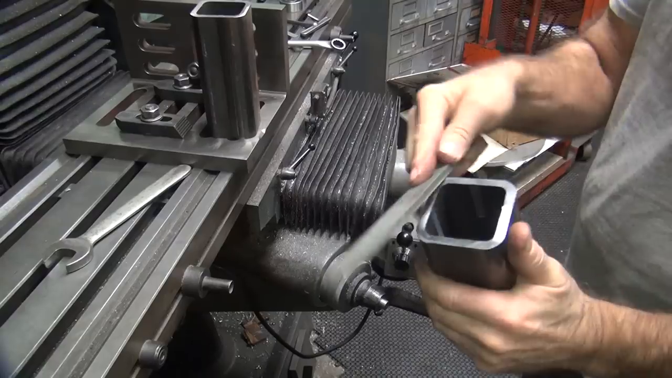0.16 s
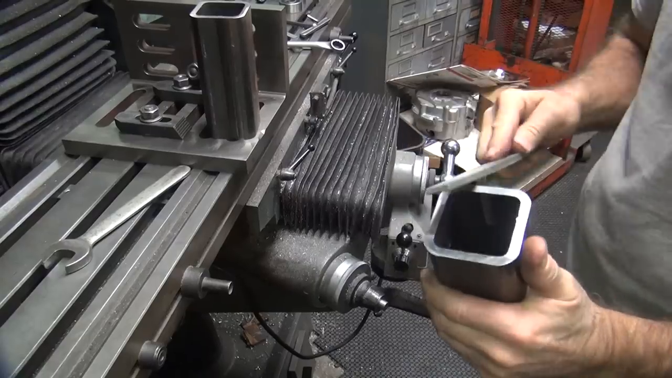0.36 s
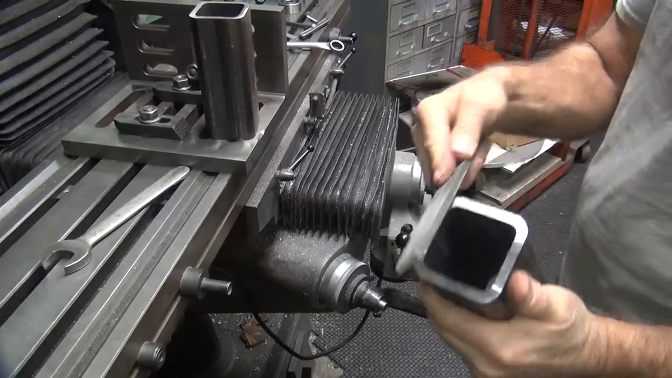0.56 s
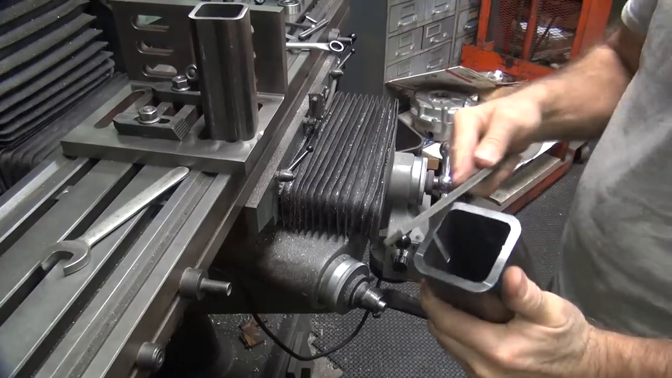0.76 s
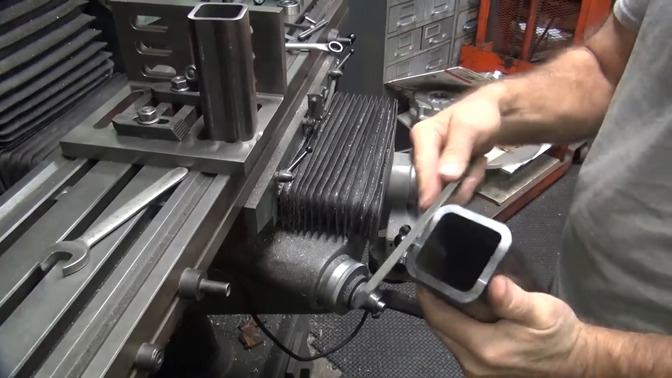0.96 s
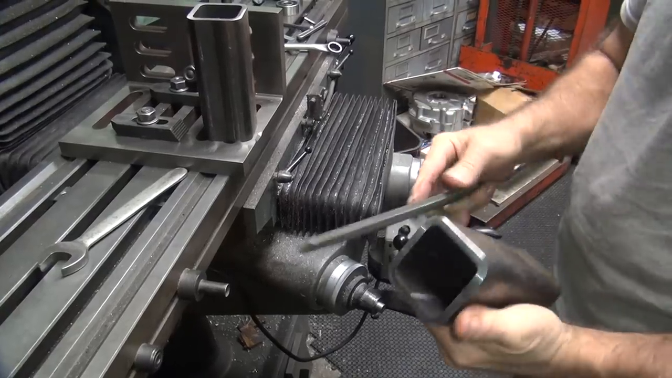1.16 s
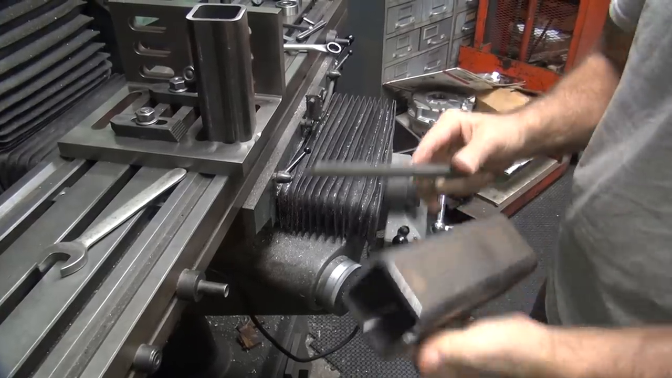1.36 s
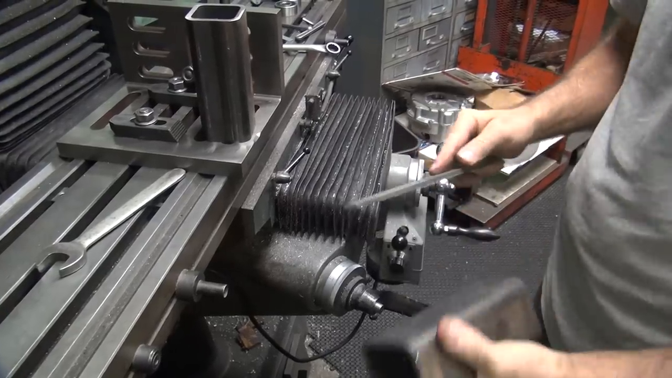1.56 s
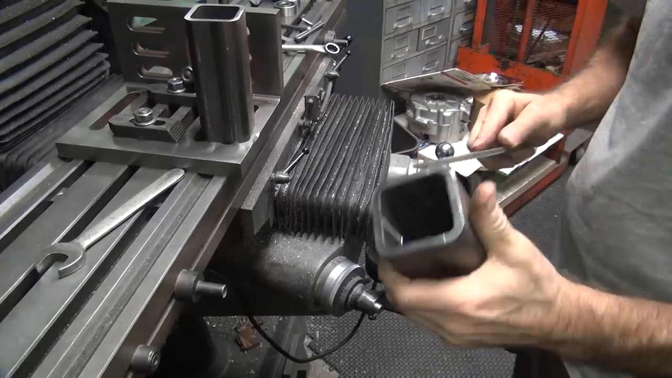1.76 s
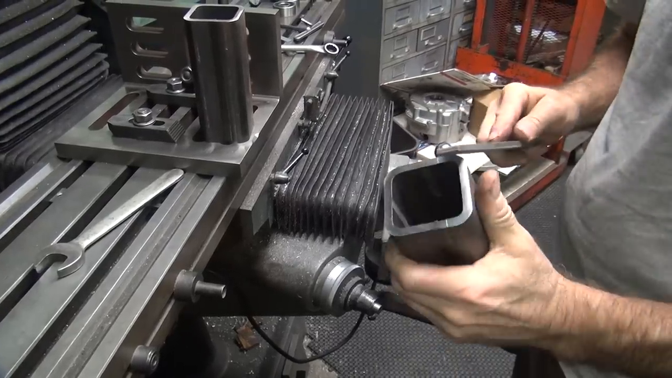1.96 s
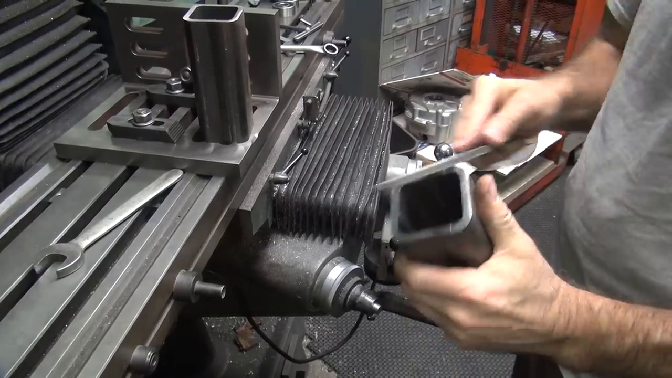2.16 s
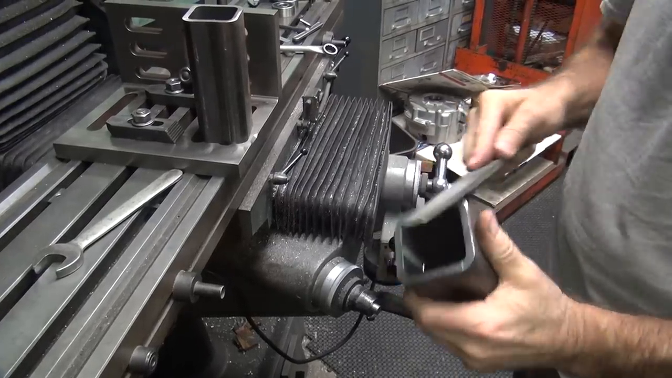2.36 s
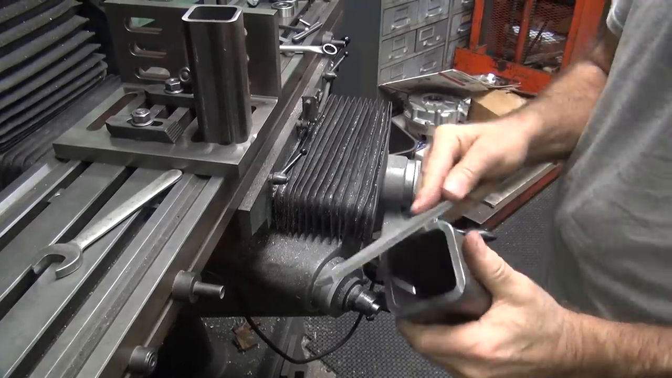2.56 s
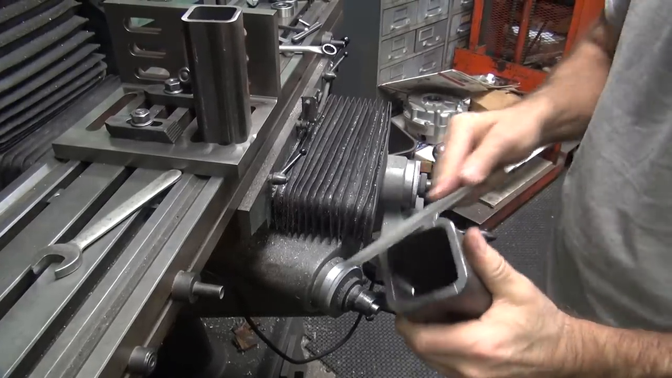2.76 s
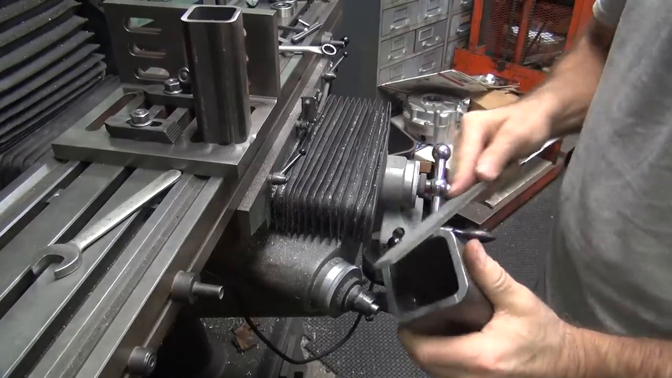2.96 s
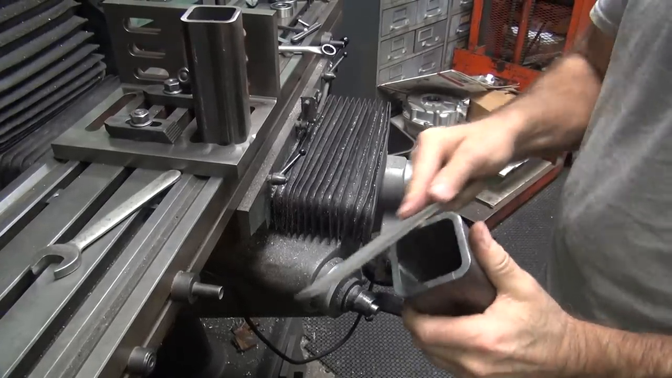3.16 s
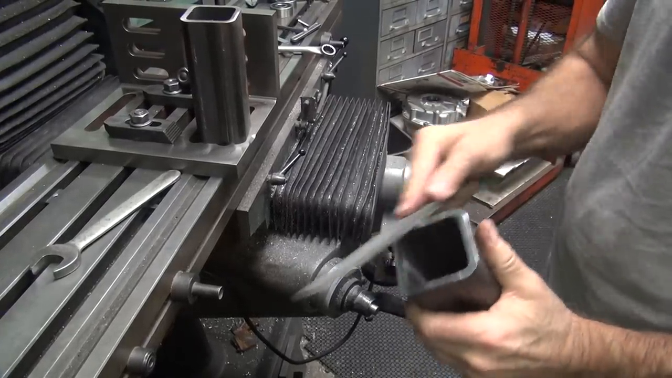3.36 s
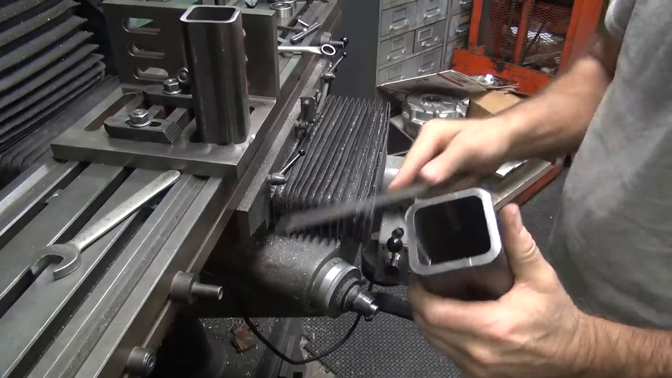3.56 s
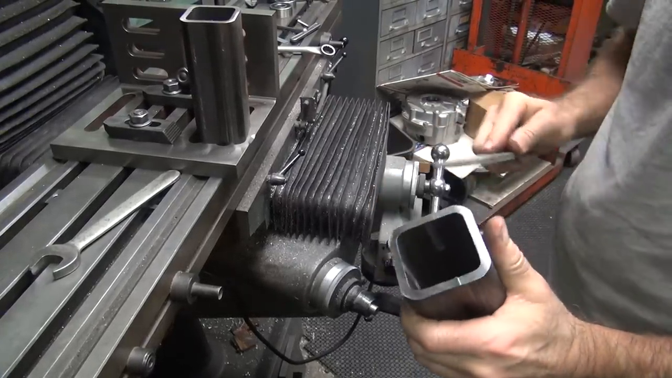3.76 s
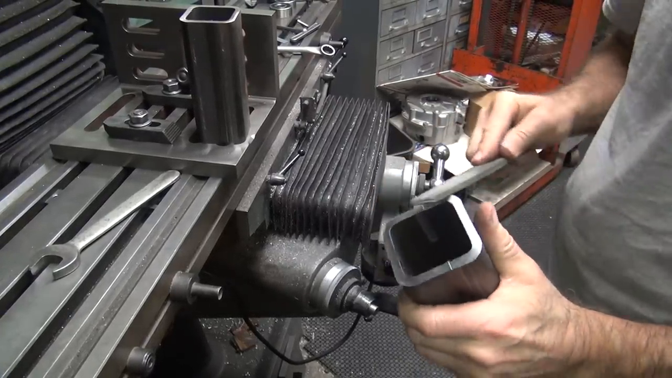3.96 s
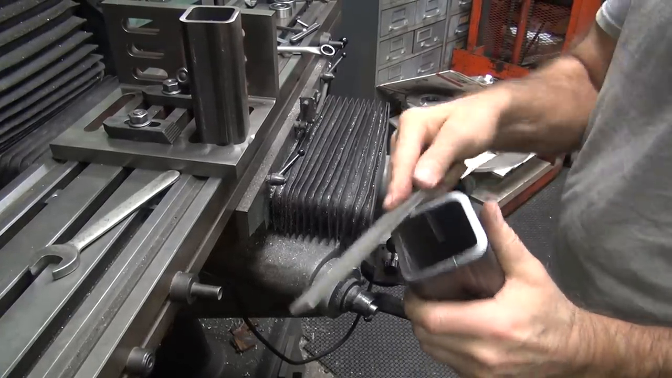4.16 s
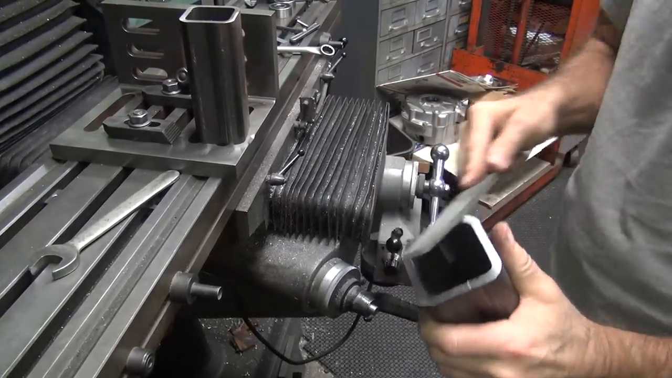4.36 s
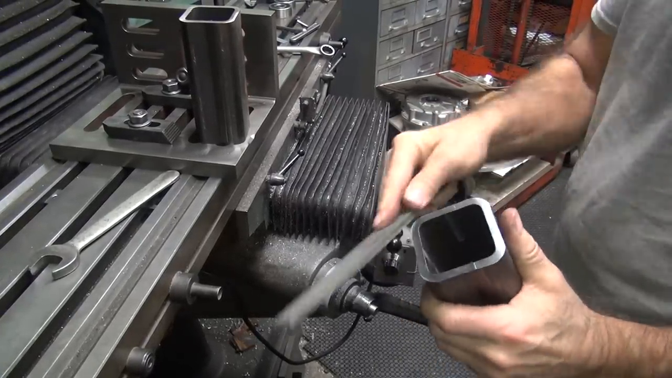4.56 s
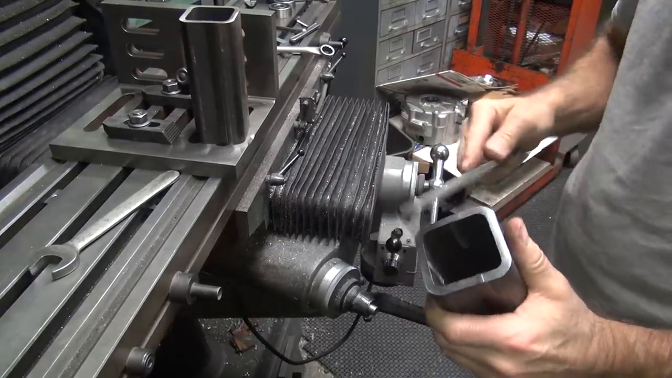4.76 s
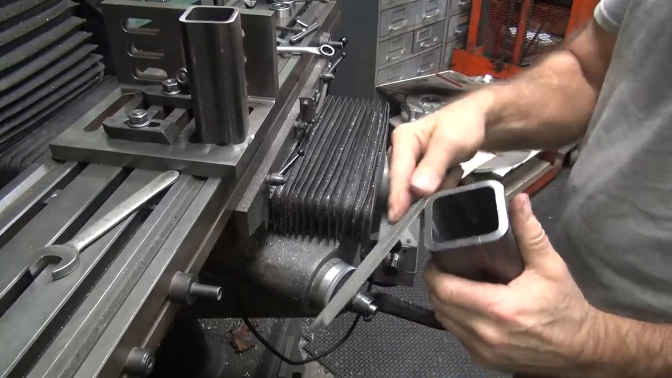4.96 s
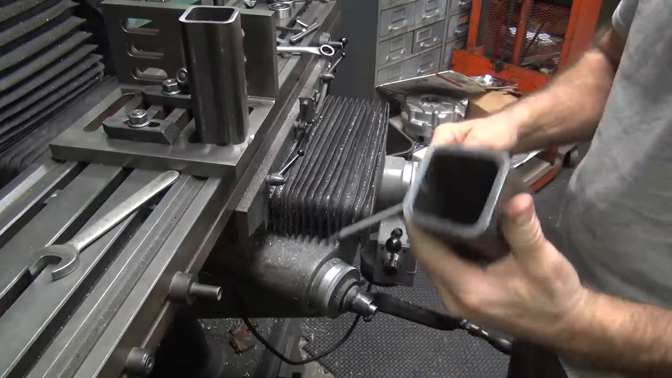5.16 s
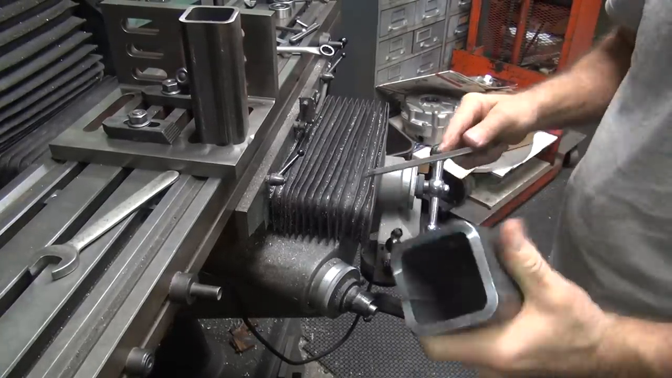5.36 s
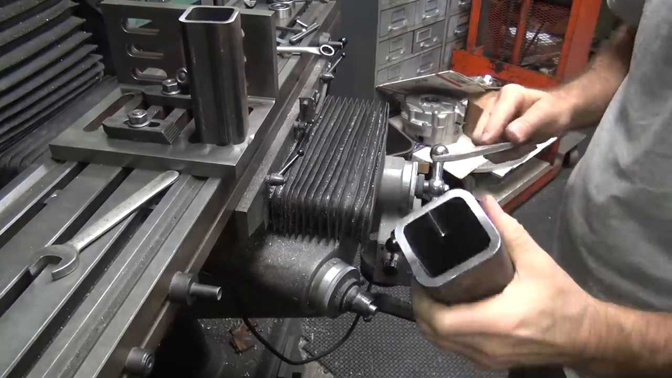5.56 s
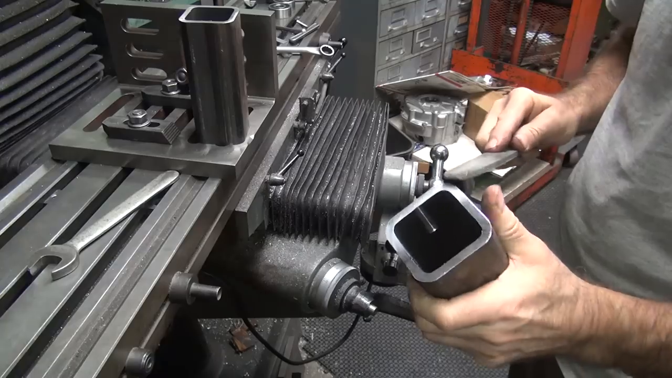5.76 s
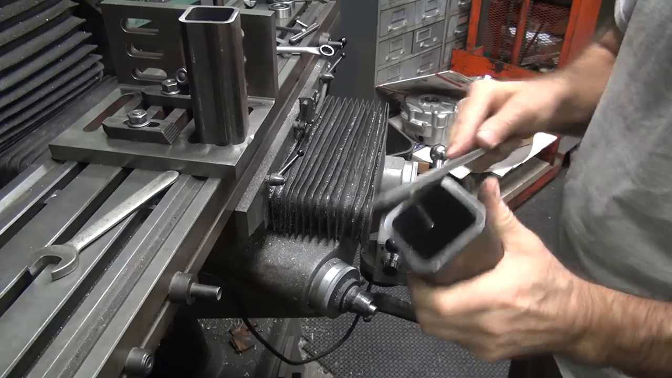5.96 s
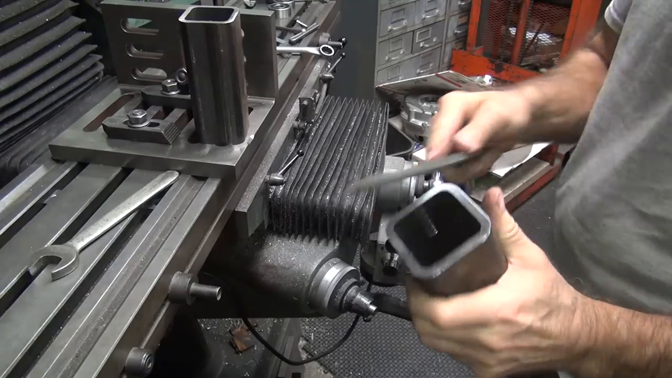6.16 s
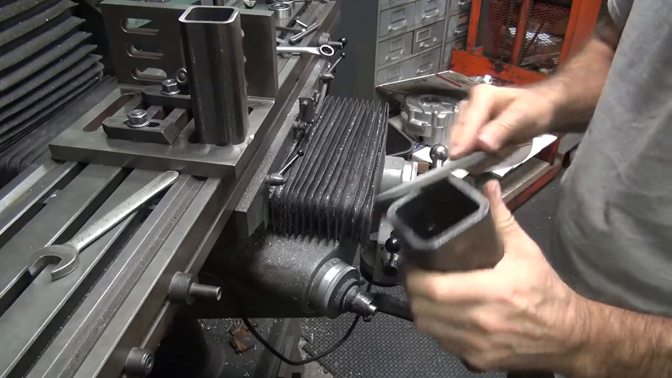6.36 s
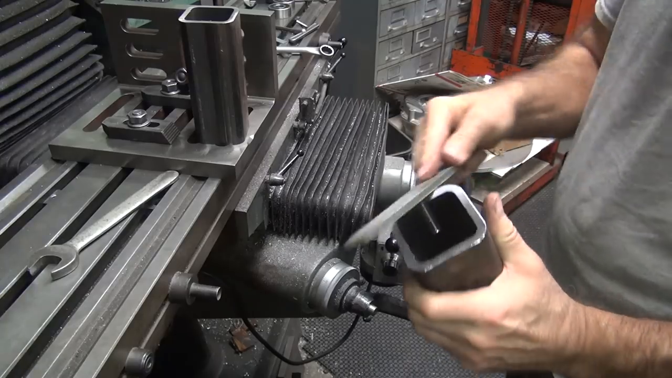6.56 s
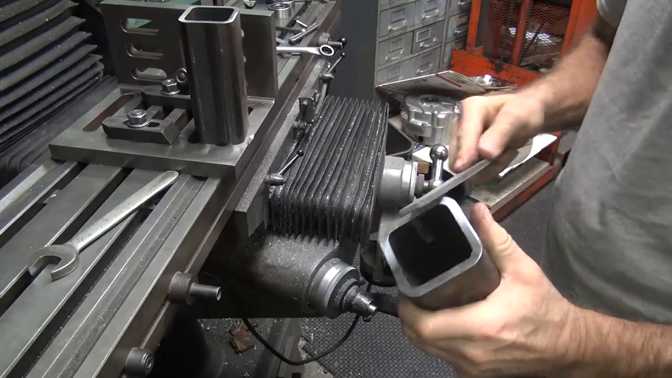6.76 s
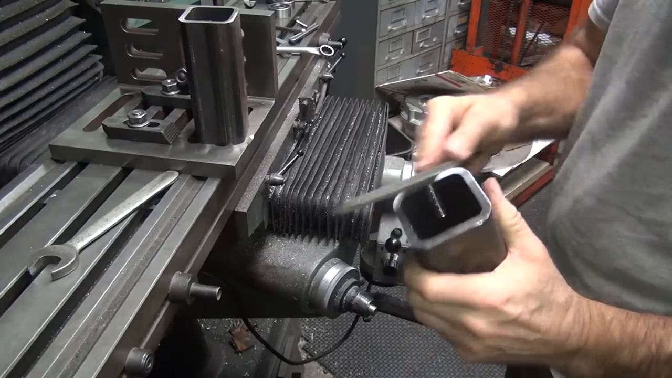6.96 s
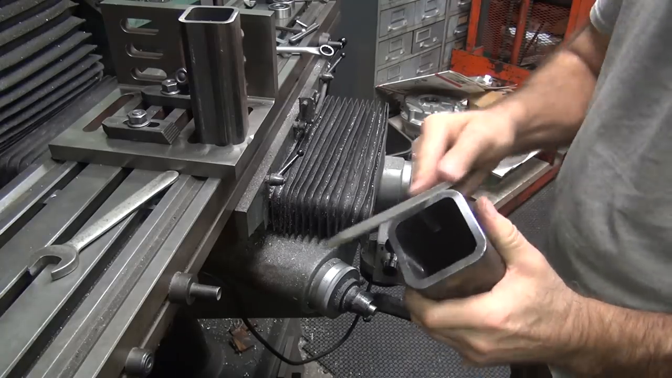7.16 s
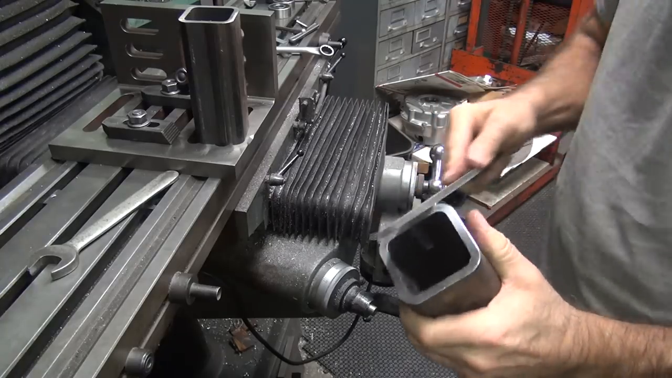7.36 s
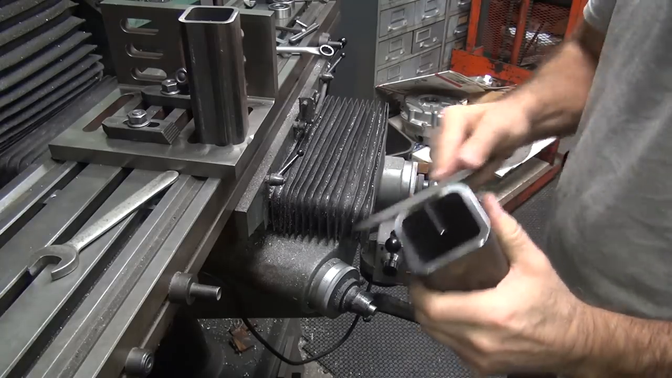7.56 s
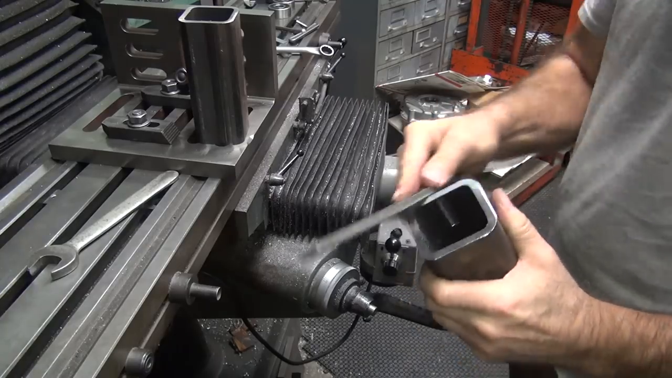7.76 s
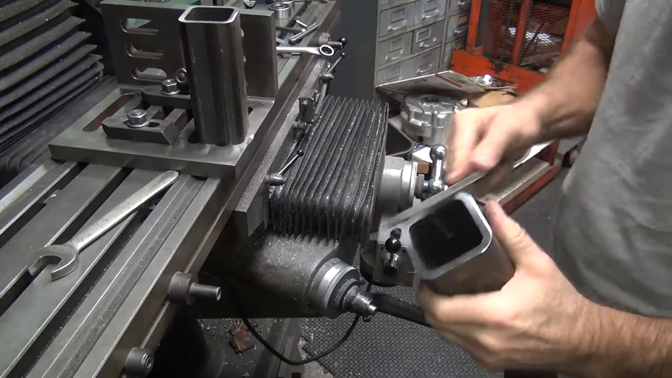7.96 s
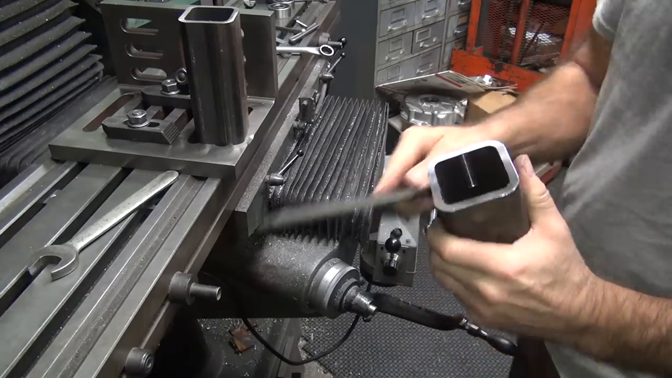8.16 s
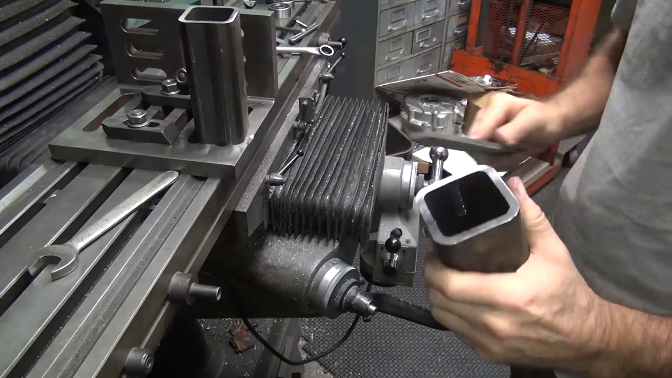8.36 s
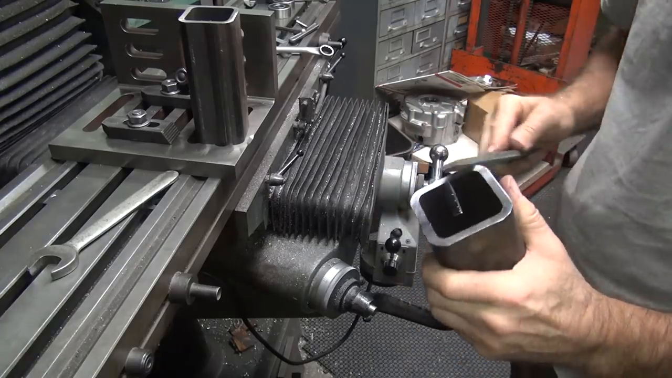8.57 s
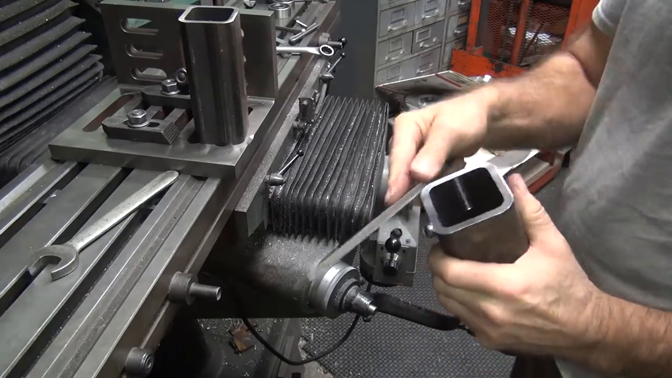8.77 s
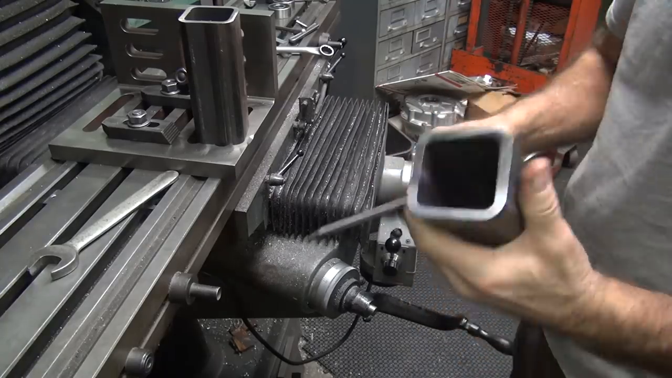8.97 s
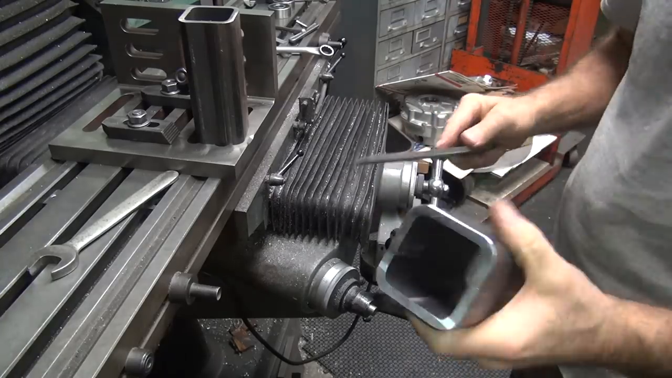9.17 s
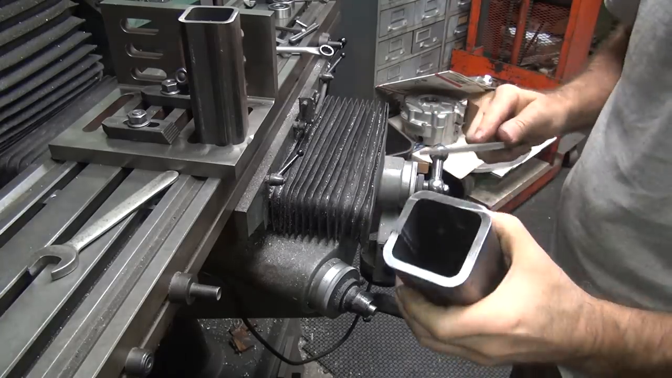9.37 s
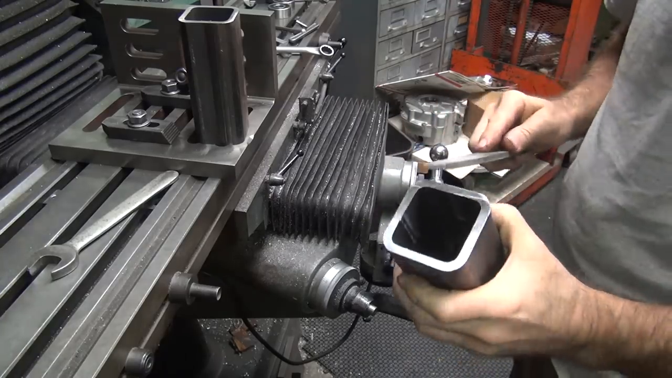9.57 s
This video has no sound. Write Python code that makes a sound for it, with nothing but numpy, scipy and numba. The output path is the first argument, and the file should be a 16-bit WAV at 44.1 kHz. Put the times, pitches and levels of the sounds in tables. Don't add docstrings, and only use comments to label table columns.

```python
import sys
import numpy as np
from scipy import signal
from scipy.fft import rfft, irfft, next_fast_len
from scipy.io import wavfile
from scipy.ndimage import uniform_filter1d
from numba import njit

SR = 44100
rng = np.random.default_rng(int(sys.argv[2]) if len(sys.argv) > 2 else 0)


def invert_db(level):
    return 10 ** (np.asarray(level, dtype=float) / 20)


def master(y):
    cut = np.clip(np.atleast_2d(y).T, -1, 1)
    pcm = np.round(cut * 32767)
    wavfile.write(sys.argv[1], SR, pcm.astype(np.int16))


N = 424241
TIME = np.arange(N) / SR

# start_s, rise_s, hold_s, rasp_db, fastest_teeth_hz
PUSHES = [(0, 0.0073, 0.16, -27, 651.7), (.465, 0.043, 0.031, -34, 560), (2.16, 0.032, 0.098, -18, 2744),
          (2.56, 0.025, 0.026, -23, 1503), (2.815, 0.018, 0.07, -22, 1448),
          (3.085, 0.021, 0.072, -25, 1300), (3.37, 0.035, 0.04, -22.5, 1405),
          (4.1, 0.031, 0.067, -24.5, 1300), (4.44, 0.024, 0.076, -26.5, 1300),
          (4.88, 0.0041, 0.11, -28.5, 1101), (5.93, 0.052, 0.032, -29.5, 599.3),
          (6.385, 0.005, 0.11, -28.5, 1047), (6.835, .06, .095, -21, 1906),
          (7.165, 0.041, 0.052, -23, 1555), (7.445, 0.022, 0.059, -21.5, 1395),
          (7.72, 0.03, 0.047, -21.5, 1300), (8.02, 0.043, 0.036, -21.5, 1300),
          (8.675, 0.028, 0.076, -22, 1203)]
# start_s, rise_s, hold_s, rasp_db, fastest_teeth_hz
PULLS = [(.69, 0.015, 0.04, -45, 986), (.783, 0.065, 0.015, -41.5, 1013),
         (.965, 0.066, 0.0041, -26.5, 519.5), (2.36, 0.037, 0.047, -24, 2001),
         (2.695, 0.052, 0.024, -22.5, 1758), (2.96, 0.036, 0.045, -26.5, 1803),
         (3.23, 0.033, 0.056, -28, 1795), (3.98, 0.062, 0.046, -37, 559.6),
         (4.295, 0.036, 0.063, -31.5, 1404), (6.095, 0.035, 0.014, -28, 500.9),
         (6.49, .04, .02, -24.5, 957.5), (7.025, 0.032, 0.056, -25, 1799), (7.31, 0.034, 0.057, -24, 1861),
         (7.595, 0.039, 0.042, -26, 1600), (7.885, 0.03, 0.056, -24, 1706)]
# start_s, rise_s, hold_s, rasp_db, fastest_teeth_hz
SKIDS = [
    (2.47, .01, .035, -40, 600.8),
    (.44, .003, 0.0096, -38.5, 398.3),
    (2.045, .003, 0.037, -35.5, 520.5),
    (5.875, .003, 0.08, -38, 408.6),
    (6.03, .01, 0.056, -42, 438.8),
    (6.79, .003, .012, -33, 420.2),
    (8.62, 0.0033, 0.053, -35.5, 428.6),
]
# start_below_full_db, hold_drift_db_per_s, release_db_per_s,
# fastest_at_share_of_length, end_tooth_rate_re_fastest
PUSH_RULE = (22, -25.5, -330, 0.5, 0.5547)
PULL_RULE = (19, 24, -620, 0.5, 0.29)
SKID_RULE = (6.5, -40, -400, 0, .5)
# from_s, blade_flex_db, tube_wall_db, thin_edge_db
FACES = [(0, -2.5, 0.5, -1.5), (.3, 4.5, 7, 0.5), (.66, -2, 1.5, -1.5), (.93, -2, -2.5, -2.5),
         (1.9, -5.5, -2.5, -3.5), (2.95, -6, -1.5, -2), (3.8, -1.5, 2.5, 1), (4.75, -0.5, 1, 1),
         (5.7, -2, 0.5, -0.5), (6.07, -9.5, -9.5, -3), (6.3, -1.5, 4, 0.5), (6.51, -8, -6.5, -5.5),
         (6.7, -6, -3, -4.5), (8.4, -3.5, -3.5, -5)]
BURR_DB = [-15, -13, -15, -17, -13.5, -9, -13, -15, -22.5, -12, -21.5, -12.5, -11, -13]
# flex_db_per_db, wall_db_per_db, edge_db_per_db
EFFORT_TILT = (-0.51, -0.053, 0.24)
# flex_db, wall_db, edge_db
PULL_TILT_DB = (-1, 1.6, 0.37)
# flex_db, wall_db, edge_db
TRAVEL_TILT_DB = (-3, 5, -4.5)
STEEL_HZ = [660, 870, 960, 1200, 1630, 1840, 2500, 3085, 3248, 3580, 4244, 4632, 4905, 6005, 6310, 7877,
            8045, 8397, 9295, 9520, 10695, 11690, 12000, 12300, 12775, 13010, 13685, 14370]
# width_hz, level_db
STEEL = [(39.5, -18), (28, -20), (40, -23), (38.5, -39), (39.4, -25.5), (118, -13.5), (35, -14),
         (28.3, -3.5), (32.6, -1), (129, -8), (31.8, -2), (31.8, 2.5), (54.4, -5.5), (38.46, -0.5),
         (47.7, -5.5), (46.5, -3.5), (50, -9), (36, -13), (36.5, -2.5), (50, -17), (79, -6.5),
         (55.7, -14.5), (70, -20.5), (45, -22.5), (42, -23.5), (38, -24.5), (48, -23), (50, -23)]
# pitch_hz, level_db
BODY = [(200, -37.5), (400, -23), (700, -12.5), (1700, -16.5), (2300, -19), (3300, -9.5), (4500, -19),
        (5500, -18.5), (7000, -22), (8200, -23.5), (10000, -20.5), (11500, -34.5), (14000, -48),
        (15000, -40)]
BAND_EDGES_HZ = [2300, 3900, 6900, 11300]
# middle_s, pitch_hz, extra_db
SWELLS = [(0.531, 3240, 8), (0.531, 4870, 10), (.73, 4242, 4), (.85, 1630, 6), (0.861, 4632, 4),
          (.85, 960, 17), (1.029, 4632, 10), (1.03, 3085, 9), (1.03, 960, 2), (4.55, 6003, 8),
          (6.14, 4632, 7.5), (2.07, 6003, 2.5), (2.07, 8397, 6.5), (2.219, 4632, 3.5), (2.28, 4242, 12),
          (2.259, 10695, 5.5), (2.27, 8397, 6), (2.239, 13685, 7), (6.16, 870, 17), (2.433, 3580, 3),
          (2.6, 4242, 6.5), (2.62, 3240, 14), (8.64, 960, 24.5), (2.78, 4632, 5), (2.87, 4632, 4),
          (2.87, 13685, 14), (3.02, 3580, 6.5), (3.02, 9295, 3.5), (3.139, 7877, 3.5), (3.141, 9295, 7.5),
          (3.28, 9295, 1.5), (8.0, 4242, 9), (4.03, 3580, 5.5), (4.03, 960, 12.5), (4.17, 10695, 8.5),
          (4.51, 10695, 2), (4.9, 4242, 2.5), (5.0, 3240, 5.5), (4.99, 960, 5.5), (5.9, 2500, 17),
          (5.9, 3240, 17.5), (5.99, 3240, 18), (5.97, 3085, 7), (6.15, 4242, 5), (6.14, 6003, 7),
          (6.42, 3085, 12.5), (6.43, 3240, 12.5), (6.54, 4632, 13), (6.539, 10695, 7), (6.94, 11690, 9),
          (7.08, 6003, 11), (7.08, 10695, 5), (7.369, 6003, 4), (7.51, 4632, 8), (7.78, 6003, 6),
          (7.79, 10695, 7.5), (7.95, 10695, 4), (8.09, 4632, -0.5), (8.642, 3085, 14), (8.709, 10695, 9)]
# middle_s, pitch_hz, extra_db
NODES = [(.8, 6003, -9), (5.23, 3240, -14), (1.03, 3240, -4), (6.8, 11690, -8), (6.8, 13685, -6.5),
         (.75, 1840, -40), (.85, 1840, 2), (0.802, 3240, -5), (1.029, 10695, -16), (2.07, 4632, -16),
         (2.211, 9295, -17.5), (2.28, 3240, -4), (2.28, 3085, -8), (2.76, 3085, -16.5),
         (2.758, 3240, -22.5), (3.02, 4242, 0.5), (3.02, 3240, -5.5), (3.28, 4242, -7), (3.28, 3240, -8.5),
         (3.44, 3580, -7), (4.03, 4242, 0), (4.03, 4632, -7.5), (4.36, 4242, -6.5), (4.36, 3085, -24),
         (4.36, 1840, -2.5), (4.92, 10695, -11.5), (5.0, 10695, -4.5), (5.0, 6003, -10), (5.9, 10695, -35),
         (5.99, 10695, -20.5), (5.9, 4632, -16), (5.9, 11690, -10), (5.99, 6003, -9), (6.42, 10695, -9.5),
         (6.42, 4632, 2.5), (6.54, 6003, 3.5), (6.911, 10695, -6), (7.22, 10695, -7), (7.5, 3580, -4.5),
         (7.66, 8397, -15.5), (7.78, 8397, -3), (8.65, 9295, -1.5), (8.65, 3580, -5), (8.8, 10695, 2)]
# start_s, peak_db, contact_ms, thud_db
KNOCKS = [(0.006, -13, 5.7, -35.5), (0.437, -11, 1.9, -25), (0.965, -17, 1.582, -26.5),
          (2.042, -19.5, 3.1, -34.5), (3.963, -20.5, 3.4, -24), (4.877, -2, 1.6, -27),
          (5.871, -17, 3.4, -31), (6.379, -7.5, 4, -30), (6.631, -23, 9.2, -48), (6.783, -7.5, 6.3, -23),
          (8.618, -17.5, 2.3, -21)]
# start_s, peak_db, centre_hz
TICKS = [(1.209, -43, 11000), (1.2311, -45, 9864), (1.262, -43.5, 8500), (1.2686, -60.5, 5000),
         (1.3697, -58.5, 6000), (1.3937, -47, 3480), (1.4115, -35.5, 3040), (1.5273, -48, 10930),
         (1.564, -43.5, 10960), (1.6892, -50.5, 10290), (1.834, -42.5, 9700), (4.7598, -54.5, 650),
         (5.2151, -51, 3480), (5.2374, -49, 3400), (5.376, -56, 1010), (5.5845, -55, 9520),
         (5.262, -44, 1700), (5.2915, -47.5, 8440), (5.403, -55, 11940), (5.4522, -50.5, 7900),
         (9.0064, -56, 8650), (9.0417, -48, 7970), (9.0537, -46.5, 4480), (9.0837, -45.5, 9200),
         (9.1612, -61.5, 10560), (9.1664, -61, 10700), (9.4062, -59.5, 9012), (9.4201, -59.5, 9340),
         (9.4245, -55, 9700), (9.4652, -65, 9500), (9.4992, -53.5, 10550)]
# middle_s, half_length_s, level_db
SLIDES = [(1.313, 0.044, -62), (1.438, 0.049, -60), (1.576, 0.022, -57.5), (1.781, 0.063, -57.5),
          (5.276, 0.039, -56), (5.465, 0.017, -55), (5.797, 0.1, -68), (9.019, 0.013, -62.5),
          (9.092, 0.048, -60), (9.181, 0.022, -64), (5.405, 0.02, -58.5), (9.26, 0.03, -67),
          (9.425, 0.013, -62), (9.507, 0.012, -60.5), (9.472, 0.015, -67.5)]
# pitch_hz, level_db_per_hz
SKIN = [(880, -51), (1500, -1), (4630, -1), (7470, 2), (9240, 8), (15500, 1.5), (17000, -12)]
# start_s, peak_db, pitch_hz, width_hz
PINGS = [(1.27, -43.5, 1750, 45), (9.09, -68.5, 3100, 11), (1.4, -52, 13000, 22), (1.573, -54, 12000, 45),
         (1.8, -65.5, 9800, 30), (1.6, -69, 7877, 20), (1.46, -66, 5500, 37), (1.3, -60, 3100, 11),
         (4.8, -54.5, 2000, 83), (9.087, -73, 2300, 7.6), (9.087, -64, 5900, 34)]
# start_s, peak_db
PUFFS = [(2.237, -40.5), (2.378, -53), (2.852, -48), (3.118, -52), (3.398, -59), (4.121, -58.5),
         (4.484, -50), (6.413, -55), (6.879, -50.5), (7.345, -54), (7.477, -50), (7.75, -54), (8.043, -48)]
# pitch_hz, level_db_per_hz
SHOP = [(12, -36.5), (20, -17), (80, 0.5), (300, -8), (336, -11), (644, -15.5), (1040, -19.5), (1380, -20),
        (3920, -27), (15600, -31), (17000, -33.5)]
# start_s, end_s, pitch_hz, wander_hz, level_db
HUM = [
    (0, 2.4, 93.3, 10, -68.5),
    (5.5, 8, 85.18, 30.9, -70),
    (0, 3.2, 237, 10.5, -68.5),
    (1.0, 2.6, 361, 6, -70),
    (3.5, 4.4, 465.6, 1.3, -69.5),
    (5.1, 6.58, 670.7, 5.93, -78),
]
# pitch_hz, left_minus_right_db, unrelated_share_db
PAIR = [(60, -2.5, -8.5), (200, 0.5, -14), (380, -3, -24.5), (1300, -.4, -29.5), (2400, -0.66, -29),
        (4400, -1.6, -21), (8100, -2, -15.5), (10300, 2, -19.5), (11200, 0, -51)]

SLOW_DOWN_S, TOUCH_S = 0.05, 0.012
TOOTH_DB, CROSS_DB = -4, -10.5
GRIP_WIDEN, FREE_NARROW = 0.92, 0.46
GRIP_DB, DETUNE = -41.5, 0.002
HAND_HZ = 130
BRUSH_S, BRUSH_DB = 0.011, -40
THUD_MS = 0.45
CRACK_DB, CRACK_MS = -16.5, 0.56
ROOM_T60_S, ROOM_DB = 0.34, -14
SHOP_DB = -57


def filing():
    force, rate_hz, back, travel = strokes()
    grit = rng.standard_normal(N)
    knock_s, knock_db, contact_ms, _ = np.transpose(KNOCKS)
    knocks = signal.lfilter([1, -.8], [1, -.62], bursts(knock_s, knock_db - 10.0, contact_ms))
    effort = force + uniform_filter1d(abs(knocks), size=64)
    flex_db, wall_db, edge_db = colour_db(effort, back, travel)
    burr_db = np.interp(TIME, np.array(FACES)[:, 0] + 0.053, BURR_DB)

    drive = (force - force.min()) * teeth(rate_hz, back) + knocks
    for at, peak_db in zip(knock_s, knock_db):
        brush = np.interp(TIME, [at - BRUSH_S, at, at + 1 / SR], [0, 1, 0])
        drive += invert_db(peak_db + BRUSH_DB) * brush * grit
    tick_s, tick_db, _ = np.transpose(TICKS)
    drive += bursts(tick_s, tick_db - 15, 2.5 + 0 * tick_s)
    drive += invert_db(-16.0) * sliding() * grit
    bite = np.clip(effort / invert_db(-28.0), .05, 1) ** 0.6
    grip = np.minimum(force / invert_db(GRIP_DB), 1)
    return steel(drive, (flex_db, wall_db, 0, edge_db, edge_db + burr_db), bite, grip)


def strokes():
    force, swing_hz, back, travel = 1e-4 + np.zeros((4, N))
    for rows, rule in ((PUSHES, PUSH_RULE), (PULLS, PULL_RULE), (SKIDS, SKID_RULE)):
        below_db, drift, release, fastest, turn = rule
        for start, rise, hold, db, top_hz in rows:
            at = slice(int(start * SR), int((start + rise + hold + .2) * SR))
            t = TIME[at] - start
            gain = np.interp(t, [0, rise], [invert_db(-below_db), 1])
            gain = gain * np.clip(t / min(TOUCH_S, rise), 0, 1)
            held_s, lifted_s = np.clip(t - rise, 0, hold), np.maximum(t - rise - hold, 0)
            gain = gain * invert_db(db + drift * held_s + release * lifted_s)
            along = np.minimum(t / (rise + hold + SLOW_DOWN_S), 1)
            speed = np.interp(along, [0, np.clip(fastest, .1, .9), 1], [0, 1, 0])
            speed = np.sin(np.pi / 2 * speed)
            force[at] += gain
            swing_hz[at] += gain * top_hz * (turn + (1 - turn) * speed)
            back[at] += gain * (rows is PULLS)
            travel[at] += gain * along
    return force, swing_hz / force, back / force, travel / force


def teeth(rate_hz, back, jitter=.11, scatter_db=6.5, grit=0.99, chatter_db=1.5, held=0.75,
          held_back=0.82, cross=0.45):
    hz = np.maximum(rate_hz * flutter(1.1, 35), 100)
    spacing, size = rng.standard_normal((N // 16, 2)).T
    passed = np.cumsum(hz) / SR
    place = np.cumsum(np.clip(1 + jitter * spacing, .2, 3))
    hit = place < passed[-1]
    pulses = np.zeros(N)
    np.add.at(pulses, np.searchsorted(passed, place[hit]), invert_db(scatter_db * size[hit]))
    rasp = pulses / np.sqrt(hz / SR) + grit * rng.standard_normal(N)

    half, now = (SR / hz / 2).astype(int), np.arange(N)
    total = np.cumsum(rasp)
    over_tooth = total[np.minimum(now + half, N - 1)] - total[np.maximum(now - half, 0)]
    taken = np.minimum(held + (held_back - held) * back, 1)
    rasp = rasp - taken * over_tooth / (2 * half)

    turns = 2 * np.pi * np.interp(passed, place, np.arange(len(place)))
    tone = invert_db(TOOTH_DB) * np.sin(turns)
    tone += invert_db(CROSS_DB) * (1 - back) * np.sin(cross * turns)
    rasp += tone * flutter(4.5, 50)
    return unit(rasp) * flutter(0.34, 120) * flutter(chatter_db, 260)


def colour_db(force, back, travel):
    faces = np.array(FACES)
    row = np.maximum(np.searchsorted(faces[:, 0], TIME) - 1, 0)
    face = uniform_filter1d(faces[row, 1:].T, size=1500, axis=1)
    effort_db = np.clip(20 * np.log10(force), -48, 0) + 28
    tilts = zip(face, EFFORT_TILT, PULL_TILT_DB, TRAVEL_TILT_DB)
    return [level + effort * effort_db + pull * back + along * (travel - .5)
            for level, effort, pull, along in tilts]


def steel(drive, bands_db, bite, grip, shift_db=6.0, shift_rate=28):
    out, edges = 0, [150, *BAND_EDGES_HZ, 20000]
    body_hz, body_db = np.transpose(BODY)
    scrape = smear(drive * bite)
    damping = FREE_NARROW + (GRIP_WIDEN - FREE_NARROW) * grip
    for band_db, lo, hi in zip(bands_db, edges, edges[1:]):
        grid = np.array([lo / 1.15, *np.geomspace(lo * 1.04, hi / 1.04, 24), hi * 1.15])
        colour = np.interp(np.log(grid), np.log(body_hz), body_db)
        colour[[0, -1]] -= 35
        modes = [(hz, width, db) for hz, (width, db) in zip(STEEL_HZ, STEEL) if lo <= hz < hi]
        power = np.trapezoid(invert_db(2 * colour[1:-1]), grid[1:-1])
        power += sum(np.pi / 2 * width * invert_db(2 * db) for _, width, db in modes)
        share = invert_db(band_db)
        band = patches(scrape * share, grid, colour)
        for hz, width, db in modes:
            shift = flutter(shift_db, shift_rate)
            push = invert_db(db) * drive * share * swell(hz) * shift * 2 * np.pi * width / SR
            pitch_hz = hz * (1 + DETUNE * grip * np.log(shift))
            keep = 1 - np.pi * width * np.maximum(damping, width / HAND_HZ) / SR
            band += 1.08 * ring(push, 2 * np.pi * pitch_hz / SR, keep)
        out = out + band / np.sqrt(2 * power / SR)
    return shape(out, [310, 400, 510, 790, 1100, 14500, 15300, 16500],
                 [-5.0, -9.5, -2.5, -6.0, -4.0, 1.0, -12.5, -23])


def smear(x):
    response = np.zeros(2048)
    response[0] = 1
    for lag in (23, 41, 67, 109):
        back = np.r_[1, np.zeros(lag - 1), .6]
        response = signal.lfilter(back[::-1], back, response)
    return signal.fftconvolve(x, response)[:N]


def patches(x, grid, colour, patchy_db=6.5, rate=40, count=4):
    place = np.linspace(0, count - 1, len(grid))
    out = 0
    for part in range(count):
        part_db = 20 * np.log10(np.clip(1 - abs(place - part), .02, 1))
        out = out + shape(x * flutter(patchy_db, rate), grid, colour + part_db)
    return out


def swell(hz, length_s=0.056):
    gain_db = np.zeros(N)
    for s, near_hz, db in SWELLS + NODES:
        if min(STEEL_HZ, key=lambda f: abs(f - near_hz)) == hz:
            at = slice(max(int((s - .2) * SR), 0), int((s + .2) * SR))
            gain_db[at] += db * np.exp(-((TIME[at] - s) / length_s) ** 2)
    return invert_db(gain_db)


@njit
def ring(x, turn, keep):
    out, z = np.empty(len(x)), 0j
    for i in range(len(x)):
        z = z * keep[i] * complex(np.cos(turn[i]), np.sin(turn[i])) + x[i]
        out[i] = z.imag
    return out


def thuds():
    out, t = np.zeros(N + 1024), np.arange(1024) / SR * 1000 / THUD_MS
    for s, *_, db in KNOCKS:
        out[int(s * SR):][:len(t)] += invert_db(db) * (1 - t) * np.exp(-t)
    s, db, *_ = np.transpose(KNOCKS)
    return out[:N] + bursts(s, db + CRACK_DB, CRACK_MS + 0 * s)


def fingers():
    out = np.zeros(N + 2048)
    noise = rng.standard_normal((len(TICKS), 1024)) * np.exp(-np.arange(1024) / 5.9)
    for (s, db, hz), row in zip(TICKS, noise):
        tick = mode(row, hz, 0.3 * hz) + 0.5 * row
        out[int(s * SR) + 50:][:1024] += invert_db(db + 8.5) * tick / abs(tick).max()
    slide = unit(shape(rng.standard_normal(N), *np.transpose(SKIN))) * flutter(2.5, 140)
    return out[:N] + sliding() * slide


def sliding():
    return sum(invert_db(db) * np.exp(-((TIME - s) / half) ** 2) for s, half, db in SLIDES)


def taps():
    out, t = np.zeros(N + 8192), np.arange(8192) / SR
    for s, db, hz, width in PINGS:
        ping = np.sin(2 * np.pi * hz * t) * np.exp(-np.pi * width * t)
        out[int(s * SR):][:len(t)] += invert_db(db) * ping
    return out[:N]


def puffs(width_ms=5.5):
    out, t = np.zeros(N + 4096), np.arange(4096) / SR * 1000 / width_ms
    for s, db in PUFFS:
        out[int(s * SR):][:len(t)] += invert_db(db + 8.0) * t * (2 - t) * np.exp(-t)
    return out[:N] * invert_db([[-3.5], [2.5]])


def reflections(x, t60):
    t = np.arange(int(1.3 * t60 * SR)) / SR
    tail = rng.standard_normal(len(t)) * np.exp(-np.log(1000) * t / t60)
    return signal.fftconvolve(x, tail / np.sqrt(np.sum(tail ** 2)))[:N]


def shop():
    air = unit(shape(rng.standard_normal(N), *np.transpose(SHOP)))
    air = air * invert_db(SHOP_DB - 7.0) * flutter(1.0, 0.97)
    for start, end, hz, wander, db in HUM:
        on = np.interp(TIME, [start - .1, start, end, end + 0.17], [0, 1, 1, 0])
        air += invert_db(db) * on * unit(mode(rng.standard_normal(N), hz, wander))
    return air


def bursts(s, db, ms):
    out, t = np.zeros(N + 2048), np.arange(2048) / SR
    noise = rng.standard_normal((len(s), len(t)))
    for at, peak_db, length, row in zip(s, db, ms, noise):
        out[int(at * SR):][:len(t)] += invert_db(peak_db) * row * np.exp(-1000 * t / max(length, .05))
    return out[:N]


def flutter(spread_db, rate):
    knots = invert_db(spread_db * np.clip(rng.standard_normal(1500), -2, 1.5))
    return np.interp(TIME * rate, np.arange(len(knots)), unit(knots))


def mode(x, hz, width):
    r = np.exp(-np.pi * width / SR)
    feedback = [1, -2 * r * np.cos(2 * np.pi * hz / SR), r * r]
    return signal.lfilter([(1 - r * r) / 2, 0, (r * r - 1) / 2], feedback, x)


def shape(x, hz, db):
    size = next_fast_len(len(x))
    f = np.fft.rfftfreq(size, 1 / SR) + 1
    gain = invert_db(np.interp(np.log(f), np.log(hz), db))
    return irfft(rfft(x, size) * gain, size)[:len(x)]


def unit(x):
    return x / np.sqrt(np.mean(x ** 2))


def scene():
    work = filing() + thuds() + fingers() + taps()
    mid = work + invert_db(ROOM_DB) * reflections(work, ROOM_T60_S) + shop()
    hz, lean_db, apart_db = np.transpose(PAIR)
    lean_db = 1.1 * lean_db
    side = shape(reflections(mid, 0.13), hz, apart_db)
    left = shape(mid, hz, lean_db / 2) + side
    right = shape(mid, hz, -lean_db / 2) - side
    return np.array([left, right]) + puffs()


def roll_off(x):
    return signal.sosfilt(signal.butter(12, 16650, fs=SR, output="sos"), x)


def record(dry):
    loud = np.sqrt(uniform_filter1d(np.mean(dry ** 2, axis=0), size=400) + 1e-12)
    held = dry * np.minimum(1, invert_db(-21) / loud) ** .5
    held = .45 * np.tanh(held / .45)
    cut = signal.sosfilt(signal.ellip(8, .2, 80, 16650, fs=SR, output="sos"), held)
    top = signal.sosfiltfilt(signal.butter(8, 15350, "high", fs=SR, output="sos"), cut)
    missing = 1. * (loud > invert_db(-46)) * (flutter(6, 45) < 1.15)
    mix = cut - top * uniform_filter1d(missing, size=300)
    return roll_off(mix)


dry = scene()
out = record(dry)
master(out)
```